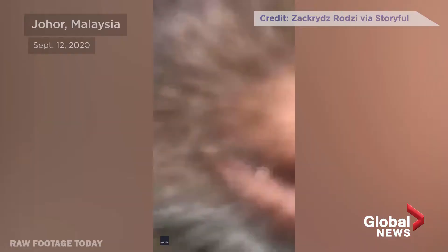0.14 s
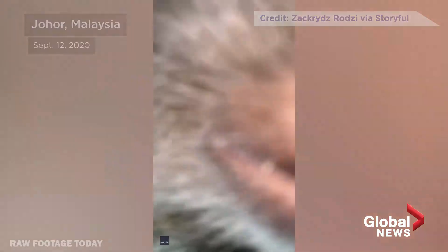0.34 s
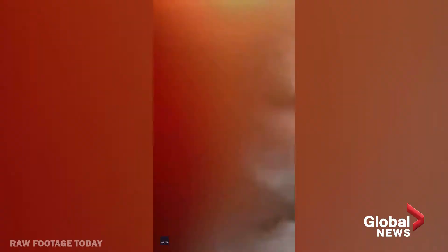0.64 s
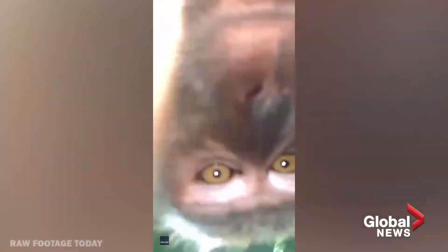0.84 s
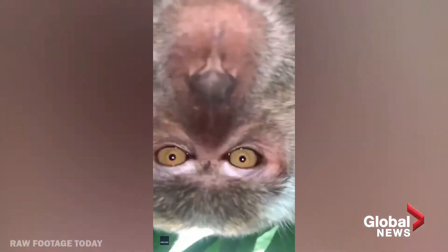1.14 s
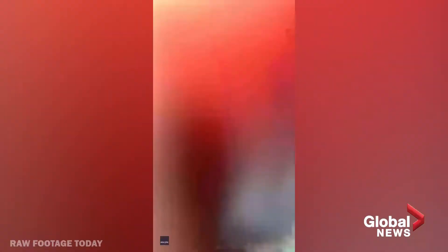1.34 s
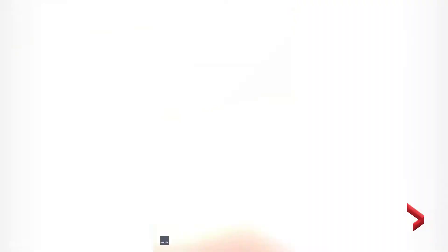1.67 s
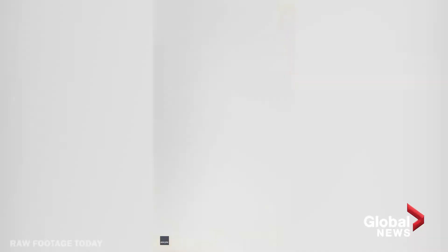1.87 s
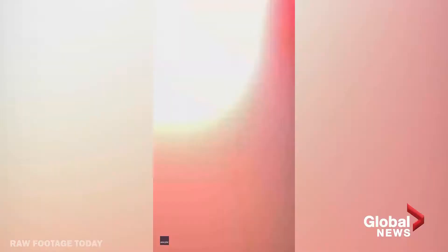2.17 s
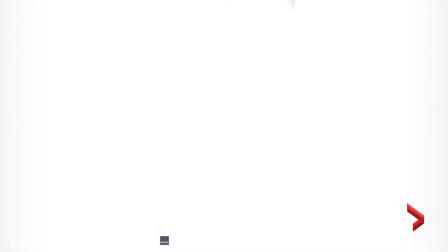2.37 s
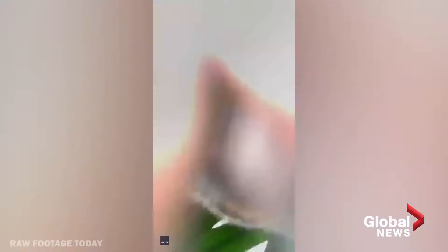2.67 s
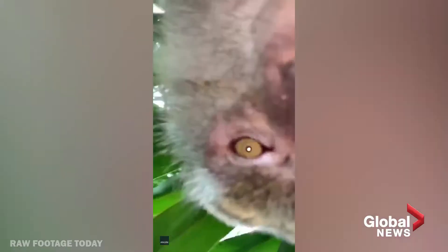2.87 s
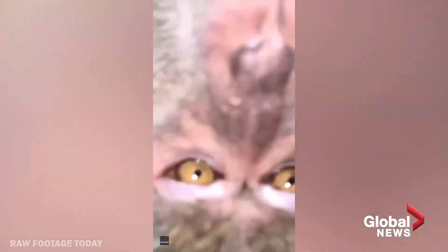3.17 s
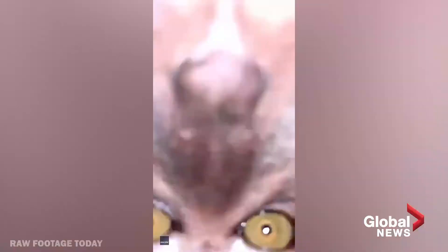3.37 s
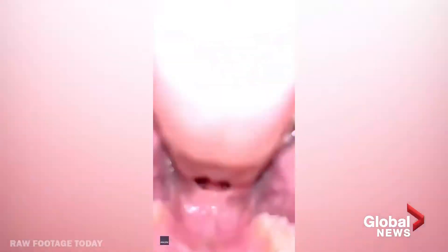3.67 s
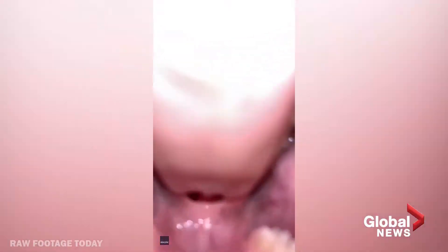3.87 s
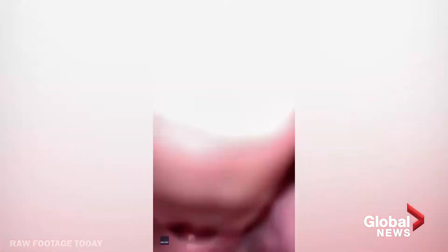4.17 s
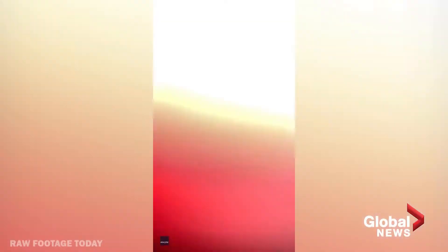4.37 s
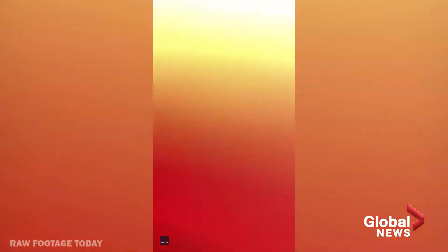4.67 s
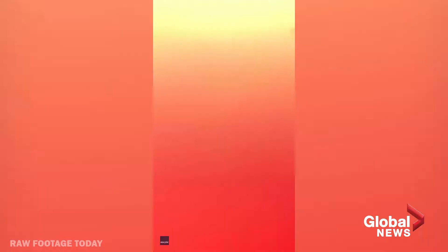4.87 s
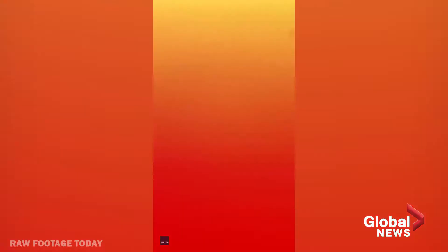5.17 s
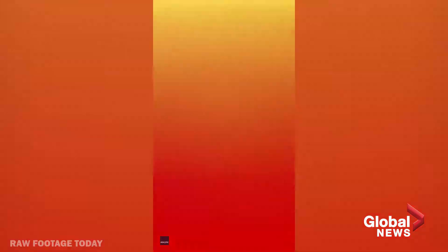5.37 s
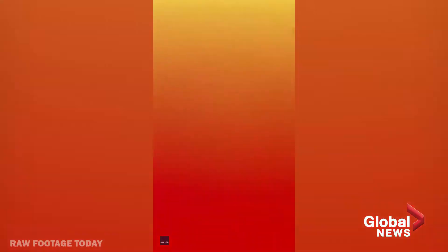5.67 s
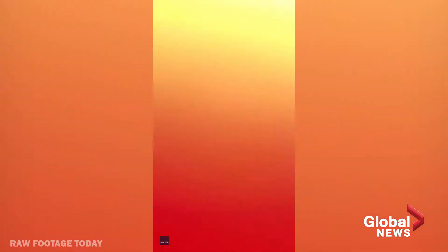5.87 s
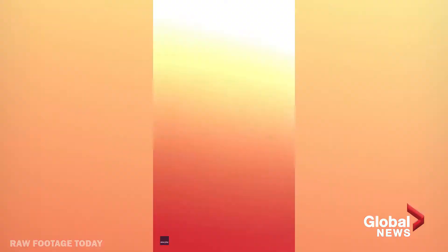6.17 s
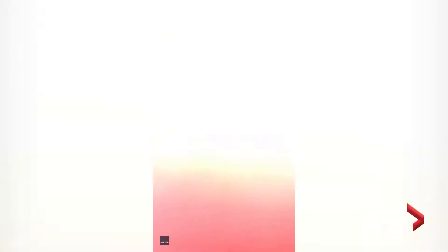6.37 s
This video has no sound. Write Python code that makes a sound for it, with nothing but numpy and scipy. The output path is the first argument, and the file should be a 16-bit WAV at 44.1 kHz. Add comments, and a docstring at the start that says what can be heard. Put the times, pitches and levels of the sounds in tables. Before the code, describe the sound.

In soft forest air with faint birds, a far animal whistles and trills. Very close, a monkey's paws bump and scuff a phone, heard through its case as dull knocks and brief scratchy rubs. The handling eases and the distant call comes again. Sharp tooth clicks and a faint wet fizz of lips gather, leading to the loudest thumps as the monkey bites over the microphone, then thin out to scattered ticks.

```python
"""Monkey with a phone in the forest

Right at the two microphones a monkey paws the phone and finally bites it. Knocks and rubs reach the
ports through the case, bass last, so each chirps downward; nails and teeth tick on the shell. Thin high
hiss swells and fades, birds peep, and far off an animal calls twice: a whistle, then a falling trill."""
import sys
import numpy as np
from scipy import signal
from scipy.fft import rfft, irfft, next_fast_len
from scipy.io import wavfile

SR = 44100
rng = np.random.default_rng(int(sys.argv[2]) if len(sys.argv) > 2 else 0)


def pcm_store(signal):
    """Save signal as 16-bit PCM."""
    levels = np.round(np.clip(np.atleast_2d(signal), -1, 1) * 32767)
    wavfile.write(sys.argv[1], SR, levels.astype(np.int16).T)


N = 287393
TIME = np.arange(N) / SR
SIZE = next_fast_len(N + SR // 4)
HZ = np.maximum(np.arange(SIZE // 2 + 1) * SR / SIZE, 1)
CALL_EDGE_S = 0.0098   # attack and release of the far animal's notes

# a paw sliding over the case, levels before trim: (peak time [s], length [s], rumble [dB],
# scuff [dB], hiss [dB], pitch of the hollow under the paw [Hz], pitch of the rasp [Hz])
SLIDES = [(0.625, .022, -33, -29.5, -41.5, 1055, 3600), (1.008, 0.03, -27.5, -47.5, -74, 890, 3700),
          (1.473, 0.02, -19, -14.5, -12.5, 1590, 4100), (1.575, 0.12, -45.5, -45, -46.5, 803, 8000),
          (1.711, 0.0306, -49.5, -35.5, -33.5, 1170, 6300), (1.747, 0.034, -29, -29, -28, 894, 6800),
          (1.878, 0.04, -50.5, -42, -57, 874, 8200), (1.928, 0.02, -49, -44.5, -54, 890, 8200),
          (1.964, .022, -48.5, -38, -57, 970, 3860), (1.997, 0.042, -37.5, -37, -56, 862, 8200),
          (2.121, 0.059, -30, -31, -29, 984, 6350), (2.27, 0.02, -41, -30, -35.5, 1296, 3760),
          (2.287, 0.0064, -9.5, -11.5, -10.5, 1554, 7000), (2.402, 0.11, -52, -50, -59.5, 895, 7600),
          (2.544, 0.034, -44, -44, -39, 924, 8700), (2.577, 0.037, -34.5, -43, -39.5, 930, 3670),
          (2.625, 0.023, -46.5, -52, -53, 930, 8350), (2.761, 0.068, -54.5, -47, -54.5, 890, 8300),
          (2.838, 0.095, -53, -54, -61, 889, 3600), (3.036, 0.16, -52, -57, -64, 927, 7570),
          (3.642, 0.024, -66.5, -51, -61, 1478, 7600), (3.741, 0.027, -34.5, -40.5, -57, 1550, 7600),
          (3.825, 0.08, -64, -50, -55, 1433, 8260), (4.245, 0.0713, -63, -48.5, -68, 1420, 3600),
          (4.586, 0.08, -42.5, -49, -48, 955, 6670), (5.026, 0.032, -64.5, -51.5, -47.5, 1534, 3700),
          (5.227, .026, -11.5, -20.5, -41, 1161, 6300), (5.438, 0.016, -17.5, -30.5, -54.5, 1235, 6300),
          (5.484, 0.026, -13.5, -24.5, -42, 1146, 5000), (5.615, 0.058, -46.5, -43, -56, 1030, 6150),
          (5.671, 0.049, -45, -45.5, -40, 1390, 6800), (5.951, 0.044, -53, -60.5, -46, 1224, 7400),
          (6.408, 0.029, -63, -61.5, -53.5, 1400, 3740)]


def from_db(db):
    """Decibels to gain."""
    return 10 ** (np.asarray(db) / 20)


def over_hz(points):
    """A table joined by straight lines over log frequency."""
    hz, value = np.transpose(points)
    return np.interp(np.log(HZ), np.log(hz), value)


def shaped(x, response):
    """Pass a signal through a frequency response."""
    return irfft(rfft(x, SIZE) * response, SIZE)[..., :N]


def rms_one(x):
    """Scale to rms 1."""
    return x / np.sqrt(np.mean(x ** 2) + 1e-20)


def below(edge_hz, order=4):
    """Gain of a smooth low-pass."""
    return 1 / np.sqrt(1 + (HZ / edge_hz) ** (2 * order))


def wander(rate_hz):
    """A slow random drift with rms 1."""
    return rms_one(shaped(rng.standard_normal(N), below(rate_hz)))


def resonant(x, hz, sharpness, plain):
    """One broad resonance plus a plain share of the sound."""
    return plain * x + signal.lfilter(*signal.iirpeak(hz, max(sharpness, .6), fs=SR), x)


def air(split_hz=2500, flicker_db=5, flicker_hz=11, sway_db=1, hiss_trim_db=-1):
    """Open air: a low rumble and a thin hiss that flickers band by band; the bite shuts out all but bass."""
    # colour of the outdoor air: (frequency [Hz], spectral level [dB])
    spectrum = [(25, -10), (70, -1.5), (200, -6.5), (500, -13), (1000, -22), (1500, -30.5), (2300, -38),
                (3000, -34), (3550, -20.5), (4400, -37), (5900, -40), (6900, -26), (7600, -16),
                (8300, -20.5), (9300, -42.5), (11300, -34), (13500, -80)]
    # its course: (time [s], rumble [dB], hiss before trim [dB])
    levels = [(0, -50.5, -67.5), (.8, -49, -63), (1.302, -49, -61.5), (3, -52.5, -65.5),
              (4.001, -48.5, -61), (4.801, -50.5, -55.5), (6.099, -55.5, -65.5)]
    # borders of the hiss bands that flicker separately: (frequency [Hz])
    edges = [3300, 3800, 5200, 6900, 7400, 7900, 8400, 10000]
    times, rumble_db, hiss_db = np.transpose(levels)
    colour, low = from_db(over_hz(spectrum)), below(split_hz)
    sway = rms_one(shaped(rng.standard_normal((len(edges) + 2, N)), below(flicker_hz)))
    rumble = rms_one(shaped(rng.standard_normal(N), colour * low)) * from_db(sway_db * sway[0])
    bands = np.diff([low ** 2, *(below(hz, order=24) ** 2 for hz in edges), np.ones_like(HZ)], axis=0)
    hiss_bands = shaped(rng.standard_normal(N), colour * bands) * from_db(flicker_db * sway[1:])
    hiss = rms_one(hiss_bands.sum(axis=0)) * from_db(np.interp(TIME, times, hiss_db) + hiss_trim_db)
    bass = shaped(rumble, below(edge_hz=140))
    rumble = bass + (rumble - bass) * mouth_seal()
    return rumble * from_db(np.interp(TIME, times, rumble_db)) + hiss * mouth_seal()


def noise_swell(peak_s, length, hz, width_hz, db):
    """A narrow band of noise that swells and fades."""
    band = rms_one(shaped(rng.standard_normal(N), 1 / (1 + (2 * (HZ - hz) / width_hz) ** 4)))
    return from_db(db) * band * np.exp(-((TIME - peak_s) / length) ** 2)


def chirps(per_s=13, low_hz=1550, high_hz=4500, glide_hz_per_s=3000, width_hz=63, length=.03, db=-71):
    """Faint gliding chirps from all through the forest, at random times and pitches, blurred by trees."""
    out = np.zeros(N)
    blur = wander(width_hz / 2) + 1j * wander(width_hz / 2)
    for when, pitch, glide, loss_db in rng.random((round(per_s * N / SR), 4)):
        s = when * N / SR
        near = slice(max(int((s - 3 * length) * SR), 0), int((s + 3 * length) * SR))
        age = TIME[near] - s
        hz = low_hz * (high_hz / low_hz) ** pitch + glide_hz_per_s * (2 * glide - 1) * age
        tone = np.real(blur[near] * np.exp(2j * np.pi * np.cumsum(hz) / SR))
        out[near] += from_db(db - loss_db) * tone * np.exp(-(age / length) ** 2)
    return out * mouth_seal()


def forest():
    """Birds peep in the trees, faint hiss comes and goes, a breeze crosses the ports, an animal hoots."""
    # faint narrow bands of high hiss that swell and fade:
    # (peak time [s], length [s], pitch [Hz], width [Hz], level [dB])
    hiss_bands = [(0.153, 0.05, 3600, 224, -71), (0.468, .15, 3800, 554, -59),
                  (0.842, 0.048, 8450, 500, -63), (1.242, 0.12, 3760, 490, -59.5),
                  (1.013, 0.023, 3740, 810, -54), (2.91, 0.11, 3730, 603, -66),
                  (3.32, 0.044, 8320, 251.5, -63.5), (4.466, 0.034, 3750, 250, -62),
                  (3.892, 0.055, 8450, 282, -59), (4.048, 0.24, 3560, 262, -70),
                  (4.54, 0.22, 7000, 1123, -60)]
    # far birds, smeared by the trees: (peak time [s], length [s], pitch [Hz], width [Hz], level [dB])
    birds = [(0.136, .035, 1760, 350, -62), (0.444, 0.023, 1950, 450, -57), (0.805, .03, 1830, 300, -55),
             (1.118, 0.024, 1750, 250, -61), (.32, .045, 6350, 900, -63), (0.892, 0.041, 5300, 220, -67),
             (.95, .022, 5560, 260, -67), (1.122, 0.024, 9180, 700, -55), (1.31, 0.066, 5700, 220, -69),
             (3.26, 0.03, 5230, 140, -59.5)]
    # short far hoots: (time [s], length [s], pitch [Hz], glide [Hz/s], level [dB])
    hoots = [(1.407, 0.045, 624, 498, -43), (3.907, 0.036, 620, 400, -46)]
    breeze = noise_swell(peak_s=0.75, length=0.48, hz=64.5, width_hz=74, db=-44)
    out = breeze + chirps() + sum(noise_swell(*band) for band in hiss_bands + birds)
    for s, length, hz, glide, db in hoots:
        age = np.clip(TIME - s, 0, length)
        out += note(age, length, hz + glide * age, db)
    return out


def note(age, length, hz, db, waver_hz=5):
    """The far animal's voice: a nearly pure, slightly wavering tone with a short attack and release."""
    waver = waver_hz * wander(37)
    gate = np.clip(np.minimum(age, length - age) / CALL_EDGE_S, 0, 1)
    return gate * from_db(db) * np.sin(2 * np.pi * np.cumsum(hz + waver) / SR)


def whistle(start, held_s=0.181, pitch_hz=751, sag_hz_per_s=184, level_db=-41.5, fade_db_per_s=33):
    """A held note that scoops up, sags and is pushed hardest just before it drops away."""
    scoop_s, scoop_hz, drop_s, drop_hz = 0.055, 200, 0.0072, 63
    accent_s, accent_db = 0.029, 12.5
    length = held_s + CALL_EDGE_S
    age = np.clip(TIME - start, 0, length)
    scoop = np.maximum(1 - age / scoop_s, 0)
    drop = np.maximum(1 - (held_s - age) / drop_s, 0)
    hz = pitch_hz - sag_hz_per_s * age - scoop_hz * scoop - drop_hz * drop
    accent = np.exp(-((age - held_s + drop_s) / accent_s) ** 2)
    return note(age, length, hz, level_db - fade_db_per_s * age + accent_db * accent)


def trill(start, length=0.558, notes_per_s=28.3, quicken_per_s2=42, merge_s=0.23):
    """A falling arch chopped into short, uneven rising notes that quicken and merge towards its end."""
    top_s, top_hz, fall_hz_per_s2, swing_hz = .075, 698, 850, 36
    loudest_s, loudest_db, fade_db_per_s2, shake_db = 0.22, -38.5, 126, 1.5
    age = np.clip(TIME - start, 0, length)
    rate = (notes_per_s + quicken_per_s2 * age) * (1 + .04 * wander(21))
    beat = 2 * np.pi * np.cumsum(rate * (age > 0)) / SR
    depth = np.minimum((length - age) / merge_s, 1) ** 2
    hz = top_hz - fall_hz_per_s2 * (age - top_s) ** 2 - swing_hz * depth * np.sin(beat)
    db = loudest_db - fade_db_per_s2 * (age - loudest_s) ** 2 + shake_db * wander(38)
    return note(age, length, hz, db) * (1 - depth * (1 + np.cos(beat)) / 2)


def far_calls(trill_after_s=.395):
    """Far from the microphones an animal whistles and then trills, echoed by the trees."""
    # each call: (time [s], gain [dB])
    starts = [(0.182, -0.5), (4.223, -2)]
    # echoes off the trees: (delay [s], gain [dB])
    echoes = [(.037, -13), (.092, -14), (.15, -19.5)]
    direct = sum(from_db(db) * (whistle(s) + trill(s + trill_after_s)) for s, db in starts)
    return direct + sum(from_db(db) * np.interp(TIME - delay, TIME, direct) for delay, db in echoes)


def case_bands(thump_edge_hz=212, crack_edge_hz=2720):
    """The low, middle and high part of the case's response, as the microphones inside hear it."""
    # colour of any contact heard through the case: (frequency [Hz], gain [dB])
    spectrum = [(25, -15.5), (70, 5.5), (120, 0.5), (180, -1.5), (350, -2.5), (700, -13.5), (1300, -24.5),
                (2000, -21), (2600, -30.5), (3200, -20.5), (4200, -13.5), (5500, -16), (7000, -17),
                (9300, -22), (11300, -19), (13500, -41), (16000, -53.5)]
    # narrow resonances of the case: (frequency [Hz], width [Hz], gain over that colour [dB])
    resonances = [(850, 6.2, 0.5), (1090, 190, -1.5), (1568, 31, 3.5), (1700, 260, 6), (2110, 570, 5.5),
                  (4170, 110, -2.5), (4150, 87, 6), (5700, 330, -1), (7000, 170, -3.5)]
    peaks = 1 + sum((from_db(db) - 1) / (1 + 2j * (HZ - hz) / width) for hz, width, db in resonances)
    colour = from_db(over_hz(spectrum)) * peaks
    low, under_crack = below(thump_edge_hz, order=2), below(crack_edge_hz, order=6)
    return colour * low, colour * (1 - low ** 2) * under_crack, colour * (1 - under_crack ** 2)


def through_case(x):
    """Slow bending waves bring the bass late, spreading a push into a short falling chirp."""
    # travel through the case to the ports: (frequency [Hz], delay [ms])
    travel = [(40, 34), (70, 16), (120, 12.8), (250, 6.8), (500, 5), (1000, 3.2), (2000, 0.57),
              (4000, 0.034)]
    delay_s = over_hz(travel) / 1000
    return shaped(x, np.exp(-2j * np.pi * np.cumsum(delay_s) * SR / SIZE))


def pushes(catch_gap_s=.029, catch_db=(11.5, -18, -24.5), loss_db=1.5, catch_hz=335):
    """Yield (time, three levels, pitch) for each blow, then for the soft, even catches of long slides."""
    # paws and jaws striking the case, peak levels before trim:
    # (time [s], thump [dB], knock [dB], crack [dB], pitch of the contact [Hz])
    blows = [(0.614, -42, -32.5, -35.5, 1500), (0.622, -22.5, -39, -29.5, 380),
             (0.9962, -17.5, -22, -62, 588), (1.0225, -28, -24.5, -68, 449), (1.448, -13, -15.5, -43, 698),
             (1.454, -2, -11.5, -25, 623), (1.465, -13.5, -5, -17, 1092), (1.58, -26.5, -53, -55, 200),
             (1.702, -45.5, -27, -31.5, 1440), (1.7282, -9.5, -22.5, -34, 446),
             (1.7614, -12.5, -34, -22, 420), (1.984, -21, -34, -59.5, 690), (2.12, -23.5, -23, -37, 917),
             (2.139, -26.5, -24, -48, 900), (2.174, -22, -33, -54, 400), (2.2839, -17.5, -12, -20, 1350),
             (2.344, -45, -37.5, -54, 620), (2.457, -50.5, -38.5, -27, 1597), (2.592, -25, -35, -44, 244.3),
             (3.7293, -29, -26, -60, 1030), (4.862, -61, -39, -66, 940), (5.207, -17, -2, -25, 1008),
             (5.2121, 0, 1, -10.5, 902), (5.2272, 1.5, -4, -29.5, 760), (5.234, -3, -6, -33, 560),
             (5.2486, -9, -9, -36.5, 480), (5.261, -6.5, -28, -52.5, 168.7), (5.38, -18, -55.5, -61.5, 253),
             (5.423, -13.5, -23, -42, 795), (5.436, 3, -0.5, -38.5, 760), (5.4544, 5.5, 0.5, -7, 910),
             (5.4721, -30.5, -18.5, -10.5, 1210), (5.482, -31.5, -20.5, -16, 1087),
             (5.484, -28, -20, -19, 963), (5.493, -29, -23, -27, 990), (5.502, -19.5, -36, -41.5, 256),
             (5.6105, -14, -5.5, -11.5, 1363), (5.6258, -32, -27.5, -16.5, 1500),
             (5.652, -30.5, -25, -25, 1490)]
    for s, *levels_db, hz in blows:
        yield s, levels_db, hz
    for s, length, rumble_db, *_ in SLIDES:
        for k in range(int(length / catch_gap_s)):
            yield s + k * catch_gap_s, rumble_db + np.array(catch_db) - k * loss_db, catch_hz


def chatter(x, amount, decay_s):
    """A contact grinds or rattles as it settles: one clean hit, then a dying tail of noise."""
    age = np.arange(len(x)) / SR
    force = (age == 0) + amount * rng.standard_normal(len(x)) * np.exp(-age / decay_s)
    return signal.fftconvolve(x, force)[:len(x)]


def knocks(trim_db=(1, 0, -1), softness=0.35, reach=1.78, size=8192):
    """Each blow is one push: a soft contact thumps, a harder one rings the case and ends in a rattle."""
    low, middle, high = [np.roll(irfft(band, SIZE), size // 2)[:size] for band in case_bands()]
    out = np.zeros(N)
    for s, levels_db, hz in pushes():
        thump = signal.sosfilt(signal.butter(2, softness * hz, fs=SR, output="sos"), low)
        # flesh passes little above the contact's pitch
        cushion = signal.butter(4, min(reach * hz, SR / 4), fs=SR, output="sos")
        ring = signal.sosfilt(cushion, resonant(middle, hz, sharpness=0.6, plain=0.35))
        knock = chatter(ring, amount=0.045, decay_s=0.0077)
        crack = chatter(high, amount=0.058, decay_s=0.008)
        at = round(s * SR) - size // 2
        for part, db, trim in zip((thump, knock, crack), levels_db, trim_db):
            out[at:at + size] += from_db(db + trim) * part / np.abs(part).max()
    return out


def hollow(x, modes, sharpness, plain, shifts):
    """The steep-sided resonances of a gap, trading strength as the paw shifts."""
    rings = (from_db(db) * shift * resonant(resonant(x, hz, sharpness, 0), hz, sharpness, 0)
             for (hz, db), shift in zip(modes, shifts))
    return plain * x + sum(rings)


def impulses(per_s, cap_db, spread_db=3):
    """Tiny impulses of random time, size and sign."""
    sizes_db = np.minimum(spread_db * rng.exponential(1, N), cap_db)
    return from_db(sizes_db) * rng.choice([-1, 1], N) * (rng.random(N) < per_s / SR)


def rubs(slips_per_s=(4000, 900, 3000), trim_db=(-1, 0, -1), judder_db=3, shift_db=3, rise_share=0.49):
    """A paw slides over the microphones in a swell of tiny juddering slips: rumble, scuff and hiss."""
    # modes of the hollow under the paw: (multiple of its pitch [ratio], gain [dB])
    paw_modes = [(.85, 5.5), (1.1, 4.5), (1.29, 1), (2.1, -11.5)]
    # modes of the narrow gap at a port, rung by rasping skin: (frequency [Hz], gain [dB])
    gap_modes = [(3650, 2), (5950, 1.5), (7050, 0.5), (8000, 5.5), (11100, 4)]
    middling_scuff_db, plain_db, plain_db_per_db = -37.5, -12.5, 1.15
    out = np.zeros(N)
    shifts = from_db(shift_db * np.array([wander(rate_hz=22) for _ in gap_modes]))
    for k, (part, band) in enumerate(zip(("rumble", "scuff", "hiss"), case_bands())):
        slips = rms_one(impulses(slips_per_s[k], cap_db=12)) + 0.457 * rng.standard_normal(N)
        judder = from_db(judder_db * wander(rate_hz=90))
        if part == "scuff":   # soft skin hardly excites the lower middle of the case
            band = band * (1 - below(edge_hz=523, order=2) ** 2)
        friction = shaped(slips * judder, band)
        if part == "hiss":
            friction = hollow(friction, gap_modes, sharpness=4.75, plain=0.017, shifts=shifts)
        for s, length, *levels_db, hollow_hz, rasp_hz in SLIDES:
            rise, fall = length * rise_share, length * (1 - rise_share)
            near = slice(max(int((s - 4 * rise) * SR), 0), int((s + 4 * fall) * SR))
            age, slide = TIME[near] - s, friction[near]
            swell = np.exp(-np.abs(age / np.where(age < 0, rise, fall)) ** 1.185)
            if part == "scuff":   # pressed harder, a hollow creak turns to plain noise
                plain = from_db(plain_db + plain_db_per_db * (levels_db[k] - middling_scuff_db))
                modes = [(ratio * hollow_hz, db) for ratio, db in paw_modes]
                slide = hollow(slide, modes, sharpness=5.8, plain=plain, shifts=shifts[:, near])
            if part == "hiss":
                slide = resonant(slide, rasp_hz, sharpness=8.7, plain=0.45)
            gain = from_db(levels_db[k] + trim_db[k]) * np.sqrt(np.mean(swell ** 2))
            out[near] += gain * rms_one(slide * swell)
    return out


def mouth_clicks():
    """A click of lips or teeth swells and dies within a few cycles, louder at the nearer microphone."""
    # (time [s], pitch [Hz], peak [dB], time to the peak [s], left minus right [dB])
    clicks = [(0.6241, 2110, -22, 0.00084, -5), (0.6238, 3240, -18.5, 0.0005, -2),
              (0.6262, 820, -15, 0.0018, 3.5), (0.995, 960, -21.5, 0.0025, 1),
              (1.0218, 850, -24.5, 0.0015, -3), (2.269, 3800, -23.5, 0.00074, -2.5),
              (2.269, 1650, -29, 0.0011, 2.5), (2.278, 1168, -19, 0.0044, 11),
              (2.2855, 1850, -12, 0.0011, 10), (3.7297, 1700, -23, 0.0013, 7),
              (5.4544, 1643, -9.5, 0.00082, 4)]
    out = np.zeros((2, N))
    for s, hz, db, rise, pan_db in clicks:
        near = slice(round(s * SR), round((s + 10 * rise) * SR))
        age = np.maximum(TIME[near] - s, 0)
        ring = (age / rise * np.exp(1 - age / rise)) ** 2 * np.sin(2 * np.pi * hz * age)
        out[:, near] += from_db(db + np.array([[pan_db], [-pan_db]]) / 2) * ring
    return out


def top_hiss(rough_db=3, rough_hz=90):
    """Thin, uneven swells of very high hiss around 11 kHz."""
    # each swell of hiss: (peak time [s], length [s], level [dB])
    swells = [(0.743, 0.13, -66), (1.01, 0.079, -62.5), (1.734, 0.034, -36.5), (1.88, .05, -53.5),
              (1.966, 0.047, -51), (2.128, 0.049, -40), (2.569, 0.038, -38.5), (2.784, 0.061, -54),
              (4.607, 0.3, -62), (5.03, 0.033, -53)]
    hiss = sum(noise_swell(s, length, hz=11000, width_hz=1700, db=db) for s, length, db in swells)
    return hiss * rms_one(from_db(rough_db * wander(rough_hz)))


def ticks(uneven_db=1.0, detune=0.03, contact_s=0.00015, size=1024):
    """A nail or tooth lands, chatters and sets the shell ringing, a little differently at every spot."""
    # hard points striking the shell: (time [s], lower ring [dB], upper ring [dB])
    strikes = [(1.558, -32, -32.5), (2.204, -13.5, -21.5), (2.218, -24, -42), (2.443, -30, -34.5),
               (3.039, -47, -52.5), (3.1, -57.5, -61), (3.515, -29, -38), (3.567, -42, -45),
               (3.67, -27, -22), (3.692, -29, -46), (3.81, -29, -41), (3.8593, -39, -38.5),
               (3.9637, -47, -38.5), (4.1075, -38, -40), (4.148, -33, -37.5), (4.518, -30, -43.5),
               (4.555, -15.5, -26), (4.677, -31, -21), (4.7102, -27, -14), (4.746, -27, -27),
               (4.8266, -25.5, -22.5), (4.9113, -50, -34.5), (5.001, -40, -30), (5.0206, -27, -19),
               (5.197, -30.5, -19.5), (5.43, -29.5, -49), (5.565, -26.5, -48), (5.655, -5.5, -26),
               (5.673, -14, -18), (5.714, -13, -18), (5.8408, -25.5, -31), (6.123, -31, -34.5),
               (6.418, -24.5, -26), (6.4832, -27.5, -33)]
    # the shell's lower and upper modes: (frequency [Hz], gain [dB], time to fall 60 dB [s])
    lower_modes = [(3760, -8, 0.00065), (5700, 0, 0.00096), (6580, -5, 0.0024)]
    upper_modes = [(8300, -2.5, 0.0048), (9490, 1, 0.0037), (10830, -2, 0.0042), (11200, -2, 0.0028)]
    age, out = np.arange(size) / SR, np.zeros(N)
    for s, lower_db, upper_db in strikes:
        ring = 0
        for modes, strike_db in (lower_modes, lower_db), (upper_modes, upper_db):
            for hz, mode_db, t60 in modes:
                fading = from_db(strike_db + mode_db + rng.normal(0, uneven_db) - 60 * age / t60)
                ring = ring + fading * np.sin(2 * np.pi * hz * (1 + detune * rng.normal()) * age)
        attack = 1 - np.exp(-age / contact_s)
        at = round(s * SR)
        out[at:at + size] += chatter(ring * attack, amount=0.11, decay_s=0.0022)
    return out


def mouthing():
    """Films of saliva on the case break at random in tiny bright pops."""
    # soft wet fizz of lips and tongue: (time [s], level [dB])
    levels = [(3.3, -85.5), (3.55, -56), (4.25, -72), (4.6, -51), (5.2, -54.5), (5.65, -54), (6.1, -51)]
    pops = impulses(per_s=260, cap_db=9) * from_db(np.interp(TIME, *np.transpose(levels)))
    bright = case_bands()[2]
    return shaped(pops * mouth_seal(), bright / np.abs(irfft(bright, SIZE)).max())


def mouth_seal(start_s=5.23, end_s=5.38, shut_s=.05, open_s=0.096, loss_db=28):
    """The gain dips as the mouth closes over the ports and returns as it lets go."""
    closing = np.clip((TIME - start_s) / shut_s, 0, 1)
    holding = np.clip(1 - (TIME - end_s) / open_s, 0, 1)
    return from_db(-loss_db * closing * holding)


def ports(x, apart, lean):
    """Two microphones, alike in the bass; 'apart' is what they do not share, 'lean' favours the left."""
    # how the left port trails the right: (frequency [Hz], phase lag [rad])
    phase_lag = [(1000, 0), (2000, 3.5), (2800, 1.5), (3800, 2.29), (5000, 3.5), (6500, 4.5), (7700, 8),
                 (9000, 8.5), (11000, 13.5)]
    # the jaws work nearer to the left port: (frequency [Hz], left minus right at full lean [dB])
    balance = [(600, -2.5), (1200, 11), (2400, 8), (3800, 7), (7000, 0.3)]
    tilt = from_db(lean * over_hz(balance) * (1 - below(600) ** 2) / 2)
    lag = over_hz(phase_lag) * (1 - below(700) ** 2)
    side = shaped(apart, 1 - below(1000) ** 2)
    return np.array([shaped(x + side, tilt * np.exp(-1j * lag)), shaped(x - side, 1 / tilt)])


def scene():
    """Blows and slides right on the case, with the open air, the forest and the far caller behind."""
    blows = ports(through_case(knocks()) + ticks() + mouthing(), apart=np.zeros(N), lean=1.0)
    slides = ports(through_case(rubs()) + top_hiss(), apart=0.33 * through_case(rubs()), lean=0.44)
    outdoors = ports(air() + far_calls() + forest(), apart=0.035 * air(), lean=0)
    return blows + mouth_clicks() + slides + outdoors


def record(dry, mic_edge_hz=11950, leak_db=-20, cutoff_hz=16000):
    """The loudest thumps are gently rounded off; the microphones dull the top, and the very top is cut."""
    rounded = dry / (1 + np.abs(dry) ** 4) ** (1 / 4)
    dull = np.maximum(below(mic_edge_hz, order=30), from_db(leak_db))
    return shaped(rounded, dull * below(cutoff_hz, order=30))


dry = scene()
out = record(dry)
pcm_store(out)
```